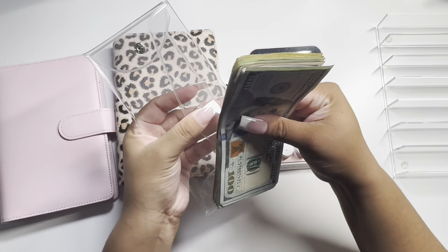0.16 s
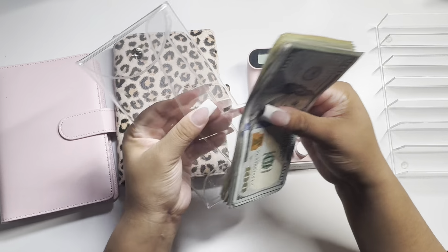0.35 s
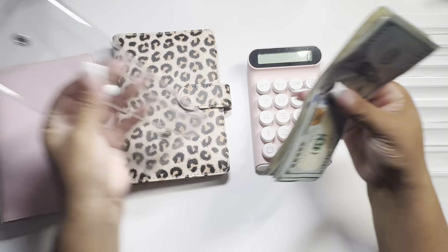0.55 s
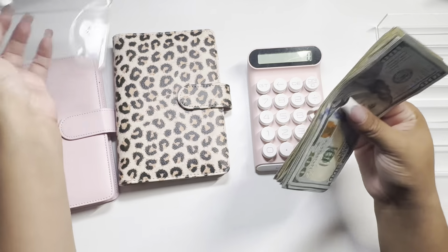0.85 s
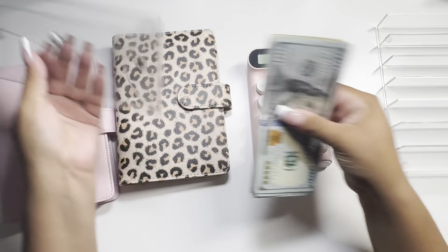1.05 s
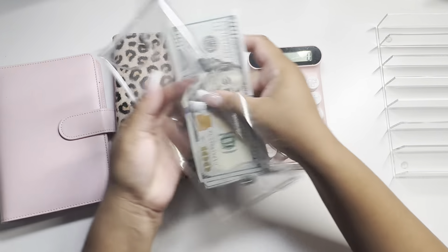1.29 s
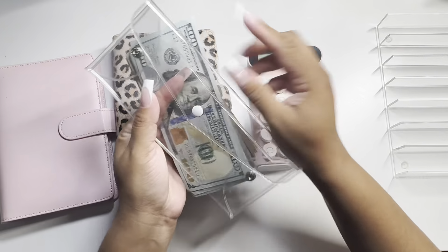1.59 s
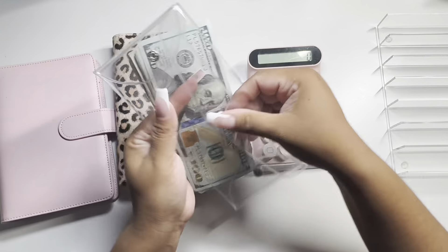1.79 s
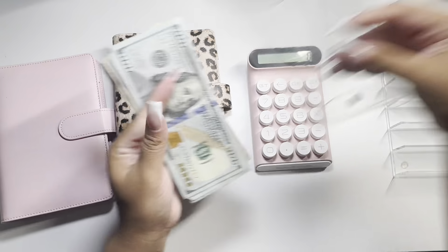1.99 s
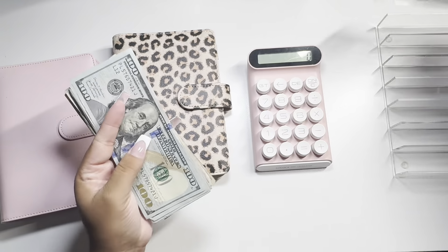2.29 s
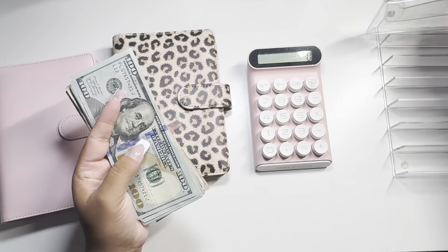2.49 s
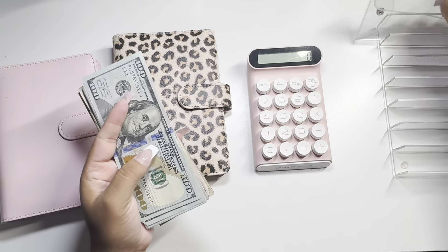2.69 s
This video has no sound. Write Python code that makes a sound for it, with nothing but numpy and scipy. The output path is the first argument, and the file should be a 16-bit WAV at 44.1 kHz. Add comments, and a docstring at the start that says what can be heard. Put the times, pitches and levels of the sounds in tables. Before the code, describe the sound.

Crisp crackling of paper money and a plastic sleeve being handled, then soft hollow knocks.

```python
"""Paper banknotes and a stiff plastic envelope are handled at a desk in a small room, over a low rumble.
From the start, creases snap above a rustle of tiny crackles. From about 0.9 to 1.4 seconds a thin,
very high sizzle sounds, and there is one soft thud. From about 2.3 seconds the envelope
goes into a hollow plastic rack, which thuds several times."""
import sys
import numpy as np
from scipy import signal
from scipy.fft import rfft, irfft, next_fast_len
from scipy.io import wavfile
from scipy.ndimage import uniform_filter1d, map_coordinates

SR = 44100
rng = np.random.default_rng(int(sys.argv[2]) if len(sys.argv) > 2 else 0)


def wrap_up_sound(samples):
    """Save the sound to the file named by the first command line argument, as 16-bit audio."""
    columns = np.atleast_2d(samples).T
    # keep every value between -1 and 1, then stretch to whole-number steps
    tamed = np.clip(columns, -1, 1)
    steps = np.round(tamed * 32767).astype(np.int16)
    wavfile.write(sys.argv[1], SR, steps)


N = 125685
TIME = np.arange(N) / SR


# Each row: time in seconds, level in dB, pitch in Hz, the crack's treble in dB.
CREASE_SNAPS = [(0.1444, -23.5, 1620, -44), (0.221, -9.5, 2570, -61), (0.2262, 1.5, 2100, -16),
                (0.229, -10, 1124, -0.5), (0.479, -34.5, 1870, -10.5), (0.497, -32, 1324, -5),
                (0.559, -23, 1110, 4), (0.577, -20.5, 1170, -4.5), (0.593, -15.5, 1220, -10),
                (0.647, -14.5, 920, -9.5), (0.747, -16.5, 2500, -16), (0.757, -17, 890, -24),
                (0.772, -23, 2210, -4), (0.846, -15, 1640, -8), (0.886, -22.5, 1890, -11.5),
                (1.012, -34, 1350, 1), (1.026, -27, 1470, -0.5), (1.044, -18.5, 1510, -4.5),
                (1.209, -22, 3330, -7), (1.23, -33, 1480, -19), (1.283, -9.5, 1280, -15.5),
                (1.329, -20.5, 2530, -1), (1.344, -18.5, 1303, 4.5), (1.388, -28, 930, -0.5),
                (1.437, -10.5, 1920, -7.5), (1.497, -24, 1240, -8), (1.536, -28, 1920, -31),
                (1.563, -35, 1080, -9), (1.634, -26.5, 2100, -28), (1.6415, -2.5, 1950, -26.5),
                (1.6904, -13, 1800, -12.5), (1.755, -21, 1340, -13), (1.762, -14.5, 1880, -16.5),
                (1.818, -33, 1950, 1), (1.987, -20.5, 3170, -7), (2.006, -29.5, 1430, -10),
                (2.024, -36.5, 1490, -10), (2.053, -30.5, 1860, -2), (2.071, -22, 1240, -5),
                (2.286, -28, 1514, -44.5), (2.345, -12, 1390, -12.5), (2.408, -6.5, 855, -14),
                (2.466, -8, 1370, 0.5), (2.523, -21.5, 1190, -4.5), (2.568, -11, 840, 0.5),
                (2.598, -15.5, 1430, -7.5), (2.686, -16, 725, -6)]
# Envelope tones in every snap. Each row: pitch in Hz, level in dB.
ENVELOPE_TONES = [(1050, -14.5), (2200, -6)]

def crease_snaps():
    """A crease gives way: a kick and tiny slips ring the sheet briefly, with a bright crack."""
    rise_s, burst_s, crack_s, ring_cycles = 0.00049, 0.0019, 0.011, 5.97
    out, t, early = np.zeros(N + SR), np.arange(SR // 12) / SR, SR // 50
    since = np.maximum(t - early / SR, 0)
    # Faint slips creep in before the snap and trail after it.
    before = amp(-26) * np.exp((t - early / SR) / 0.0032)
    after = amp(-23.5) * np.exp(-since / 0.022)
    creep = np.where(since > 0, after, before)
    rise = 1 - np.exp(-since / rise_s)
    burst = rise * np.exp(-since / burst_s) + creep
    crack_shape = rise * amp(-60 * since / crack_s) + creep
    kick = 3.04 * signal.unit_impulse(len(t), early + round(rise_s * SR))
    for s, db, hz, treble_db in CREASE_SNAPS:
        slips, sharp, wide = rng.standard_normal((3, len(t)))
        ring = sum(amp(level - 60 * t * f / ring_cycles) * np.cos(2 * np.pi * f * t)
                   for f, level in [(hz, 0)] + ENVELOPE_TONES)
        body = signal.fftconvolve(slips * burst + kick, ring)[:len(t)]
        crack = amp(treble_db + 20) * np.diff(sharp, 2, prepend=[0, 0]) + amp(-13) * wide
        snap = amp(2) * body / np.abs(body).max() + crack * crack_shape / 2
        out[round((s - 0.0009) * SR) - early:][:len(t)] += amp(db) * snap
    # A small sheet gives off almost no bass.
    return filtered(out[:N], lambda hz: (1j * hz / (260 + 1j * hz)) ** 2)


# How loud the handling is. Each row: time in seconds, level in dB.
HAND_MOTION = [(0, -63), (.13, -62), (.36, -51.5), (.465, -82.5), (.48, -49), (.6, -55.5), (.72, -52),
               (.97, -47), (1.27, -54.5), (1.33, -38.5), (1.42, -42), (1.5, -37.5), (1.56, -50.5),
               (1.59, -63.5), (1.85, -45), (1.88, -61.5), (1.97, -53), (2.11, -48), (2.15, -64.5),
               (2.32, -63.5), (2.42, -32.5), (2.5, -46), (2.62, -51), (2.85, -65)]
# Tone of sliding paper. Each row: frequency in Hz, level in dB.
PAPER_TONE = [(300, -9.5), (700, -3.5), (1200, -2.5), (2200, 6.5), (4800, 2.5), (8500, 12), (15500, -11)]

def paper_rustle():
    """Tiny crackles and a sliding hiss follow the moving hands; both are returned."""
    per_second, typical_hz, fade_cycles = 540, 1720, 2.7
    gaps, strength = -np.log(1 - rng.random((4000, 2))).T
    starts = np.cumsum(gaps / per_second) * SR
    starts = starts[starts < N].astype(int)
    count, t = len(starts), np.arange(256) / SR
    hz = np.clip(typical_hz * np.exp(0.461 * rng.standard_normal(4000)), 500, 14000)[:count, None]
    ticks = amp(4.5 * strength[:count, None]) * np.sin(2 * np.pi * hz * t)
    ticks *= np.exp(-t * hz / fade_cycles)
    places = starts[:, None] + np.arange(256)
    crackles = unit(np.bincount(places.ravel(), ticks.ravel(), N + 512)[:N])
    level = amp(curve(HAND_MOTION))
    crackles *= level * amp(-4 + 5.5 * wobble(29.83))
    hiss = level * amp(2.6 * wobble(88)) * stereo_noise(PAPER_TONE)
    return crackles, hiss


# Each row: start in seconds, level in dB.
RACK_BLOWS = [(1.278, -24.5), (2.345, -13), (2.405, -8.5), (2.437, -18), (2.464, -9.5), (2.565, -20),
              (2.597, -21), (2.684, -22.5)]
# Each row: pitch in Hz, level in dB, seconds to fade by 60 dB.
RACK_TONES = [(139, -4, 0.099), (183.4, -3, 0.069), (227.8, -1.5, 0.069), (298, -6, 0.1),
              (401, -3.5, 0.047), (939, -14, 0.03)]

def rack_thuds():
    """Each soft blow rings the hollow rack a little differently."""
    out, t = np.zeros(N + SR), np.arange(SR // 4) / SR
    rise = 1 - np.exp(-t / 0.013)
    for s, db in RACK_BLOWS:
        chance = rng.standard_normal((len(RACK_TONES), 2))
        ring = sum(amp(level + 3 * louder - 60 * t / fade_s)
                   * np.sin(2 * np.pi * hz * (1 + 0.081 * higher) * t)
                   for (hz, level, fade_s), (louder, higher) in zip(RACK_TONES, chance))
        out[round(s * SR):][:len(t)] += amp(db + 1) * ring * rise
    return out[:N]


def high_sizzle():
    """A thin, very high sizzle sounds from about 0.9 to 1.4 seconds."""
    start_s, end_s, lowest_hz = 0.93, 1.4, 14000
    gate = uniform_filter1d(1. * (TIME > start_s) * (TIME < end_s), size=SR // 20)
    hiss = stereo(rng.standard_normal((2, N)), lambda hz: 1 / (1 + (lowest_hz / (hz + 1)) ** 20))
    return amp(-28) * gate * unit(hiss)


# Each row: time in seconds, level in dB.
HAND_THUMPS = [(.01, -29.5), (.63, -36.5), (.735, -39), (.975, -40.5), (1.044, -33), (1.16, -38.5),
               (1.31, -36), (2.0, -44), (2.141, -40), (2.399, -39.5)]
# Tone of the room's air. Each row: frequency in Hz, level in dB.
AIR_TONE = [(22, -38.5), (50, -13), (250, -18.5), (600, -35.5), (2200, -37), (5000, -46), (11000, -54.5),
            (15500, -36.5)]

def rumble():
    """A low throb, soft handling thumps, a wavering hum and air stirred by the hands."""
    hum_hz, throb_hz, thump_s = 124.7, 52, 0.018
    hum = amp(-57 + 2.4 * wobble(4)) * np.sin(2 * np.pi * np.cumsum(hum_hz + 6 * wobble(2.2)) / SR)
    throb = unit(filtered(rng.standard_normal(N), lambda hz: np.exp(-((hz - throb_hz) / 22.8) ** 2)))
    thumps = sum(amp(db) * np.exp(-((TIME - s) / thump_s) ** 2)
                 * np.sin(2 * np.pi * (throb_hz * TIME + rng.random())) for s, db in HAND_THUMPS)
    stir_db = 0.44 * (uniform_filter1d(curve(HAND_MOTION), size=SR // 4) + 54)
    air = amp(-53 + stir_db + 3.4 * wobble(25)) * stereo_noise(AIR_TONE)
    return amp(-55) * throb + thumps + hum + air


# Each row: frequency in Hz, seconds to fade by 60 dB.
ECHO_FADE = [(200, 0.27), (2000, 0.23), (14000, 0.14)]

def room_echo(x):
    """Each short piece of sound gets its own echo, whose treble dies first."""
    out, piece, delay = np.zeros((2, N + SR)), 4096, 90  # in samples
    for k in range(0, N, piece):
        hz, t, noise = signal.stft(rng.standard_normal((2, SR // 3)), SR, nperseg=256)
        tail = signal.istft(noise * amp(-60 * t / along(ECHO_FADE, hz)[:, None]), SR, nperseg=256)[1]
        echo = signal.fftconvolve(x[None, k:k + piece], tail / np.linalg.norm(tail[0]), axes=1)
        out[:, k + delay:][:, :echo.shape[1]] += echo
    return stereo(out[:, :N], np.ones_like)


# Each row: frequency in Hz, how alike left and right are (1 means the same).
LIKENESS = [(60, 1), (250, 0.61), (650, 0.27), (1400, 0.23), (5000, 0.63)]

def stereo(x, gain):
    """Two unrelated signals become a partly alike left and right."""
    turn = lambda hz: np.arccos(np.clip(along(LIKENESS, hz), -1, 1)) / 2
    mid, side = filtered(x, lambda hz: gain(hz) * [np.cos(turn(hz)), np.sin(turn(hz))])
    return np.array([mid + side, mid - side])


def stereo_noise(tone):
    """Noise shaped by a tone table."""
    return unit(stereo(rng.standard_normal((2, N)), lambda hz: amp(along(tone, hz))))


def amp(db):
    """Decibels to gain."""
    return 10 ** (np.asarray(db) / 20)


def unit(x):
    """Scale to an average power of 1."""
    return x / np.sqrt(np.mean(x ** 2) + 1e-20)


def along(rows, hz):
    """Read a table between its frequencies."""
    f, values = np.transpose(rows)
    return np.interp(np.log(hz + 1), np.log(f + 1), values)


def curve(rows):
    """Read a table between its times."""
    return np.interp(TIME, *np.transpose(rows))


def wobble(rate):
    """A smooth curve through `rate` random values a second."""
    return map_coordinates(rng.standard_normal(int(N * rate / SR) + 4), [TIME * rate])


def filtered(x, response):
    """Scale and shift each frequency of x."""
    size = next_fast_len(N + SR // 2)
    return irfft(rfft(x, size) * response(np.fft.rfftfreq(size, 1 / SR)), size)[..., :N]


# Each row: frequency in Hz, how far left leads right in radians.
BASS_LEAD = [(380, 0)]
TREBLE_LEAD = [(650, 2.37), (1500, -0.39), (4800, 1.72), (6500, -0.64), (8500, 0.79), (10400, -3),
               (13600, -3), (14600, -2.5)]

def scene():
    """All sounds reach two microphone openings, which fall out of step above the bass."""
    crackles, hiss = paper_rustle()
    near = crease_snaps() + crackles + rack_thuds()
    mix = near + amp(-12.5) * room_echo(near) + hiss + rumble() + high_sizzle()
    shift = lambda hz: np.exp(.5j * np.outer([1, -1], along(BASS_LEAD + TREBLE_LEAD, hz)))
    return filtered(mix, shift)


# Each row: frequency in Hz, boost or cut in dB.
MIC_TONE = [(500, 5), (2200, 1.5), (4900, -0.5), (6500, -2.5), (16000, -22)]

def record(dry):
    """The microphone favours the bass, rounds off loud peaks and cuts the highest treble."""
    x = filtered(dry, lambda hz: amp(along(MIC_TONE, hz)))
    x = x / (1 + np.abs(x) ** 6) ** (1 / 6)
    return filtered(x, lambda hz: np.clip((16700 - hz) / 700, 0, 1) ** 2)


dry = scene()
out = record(dry)
wrap_up_sound(out)
```